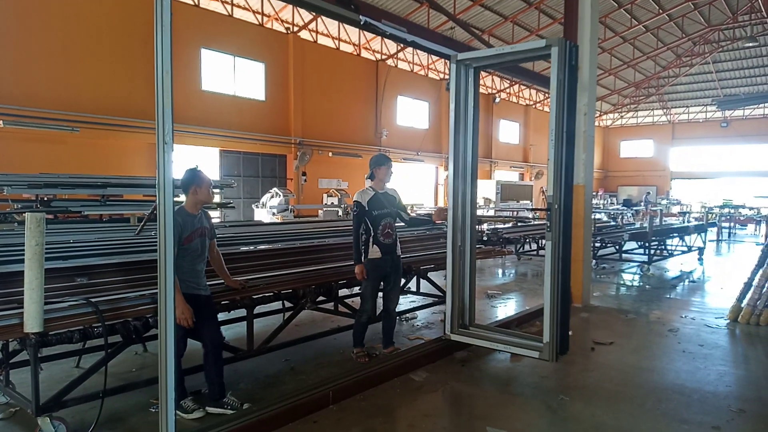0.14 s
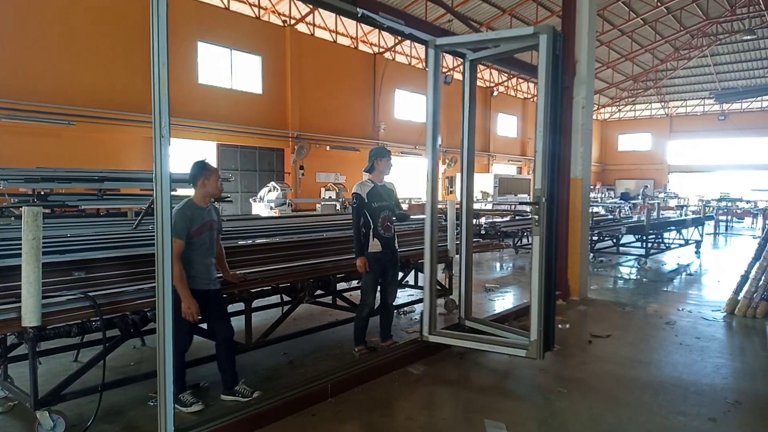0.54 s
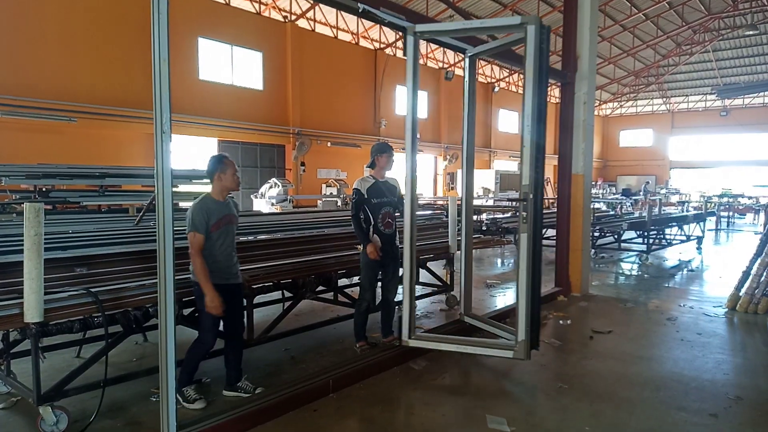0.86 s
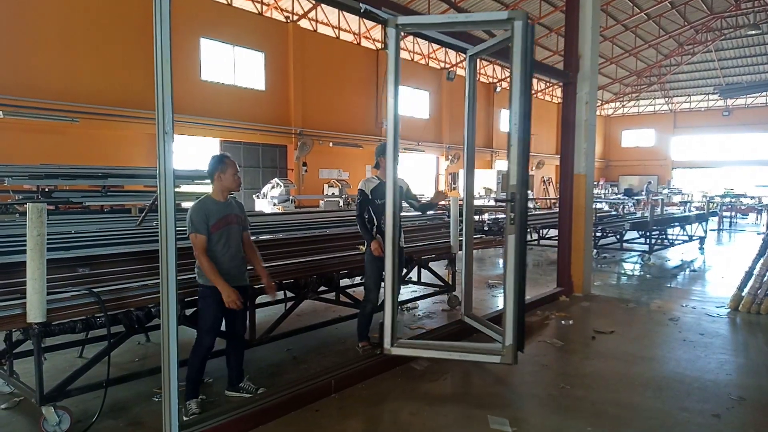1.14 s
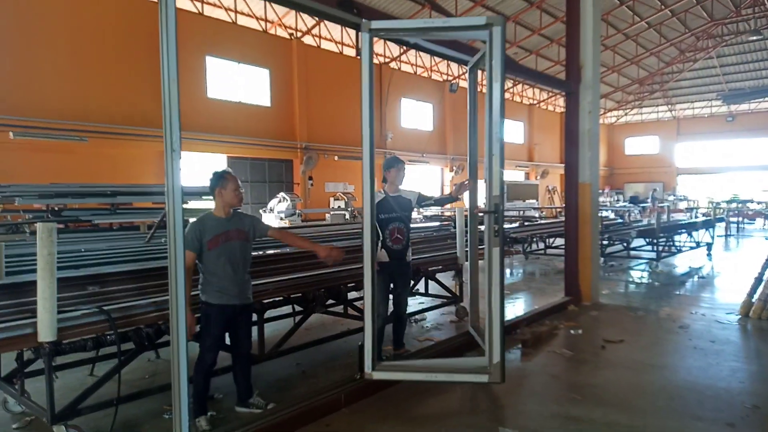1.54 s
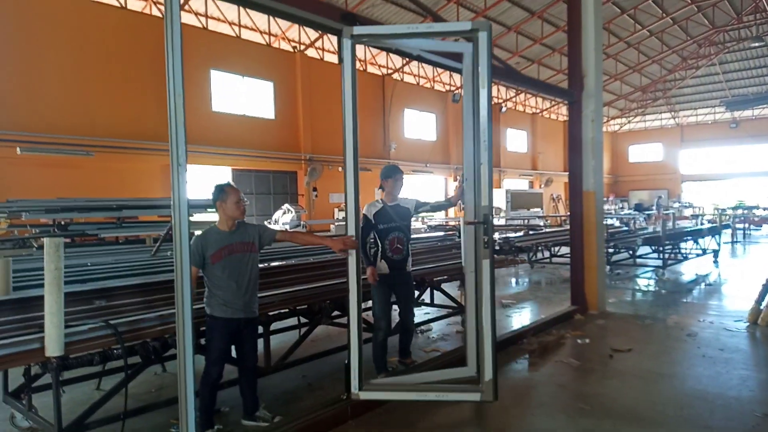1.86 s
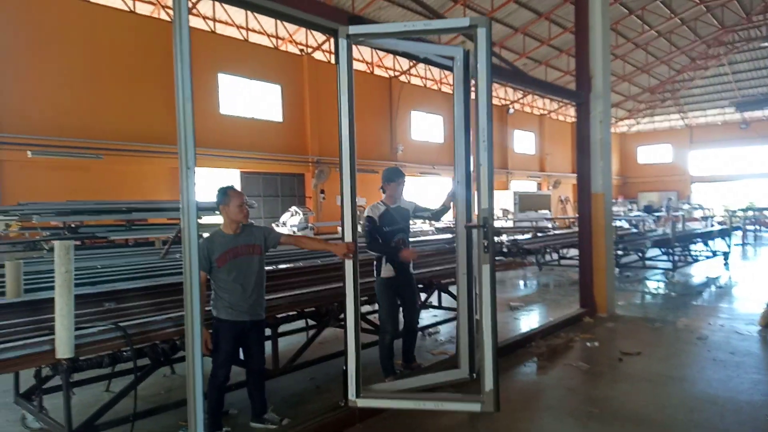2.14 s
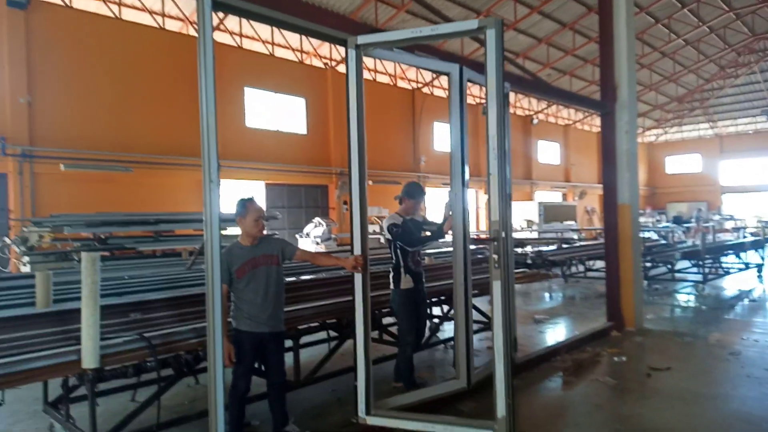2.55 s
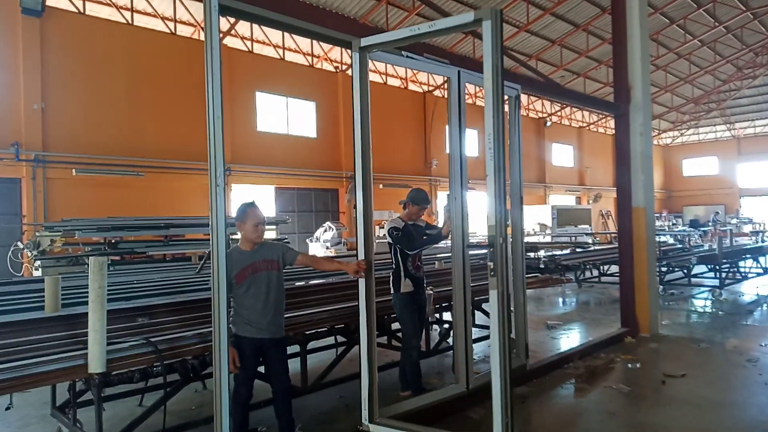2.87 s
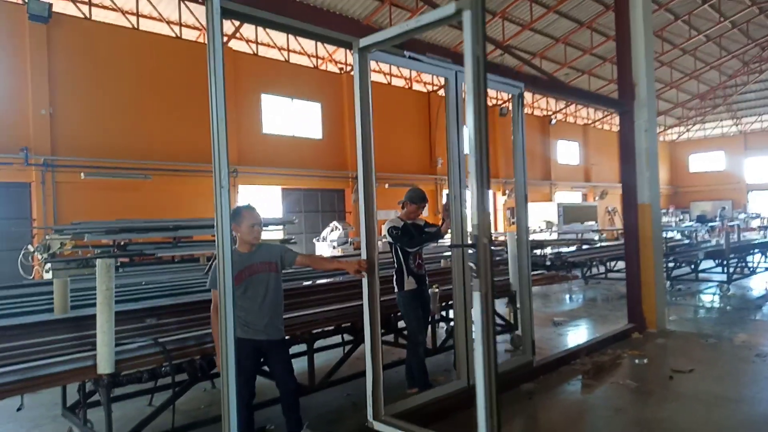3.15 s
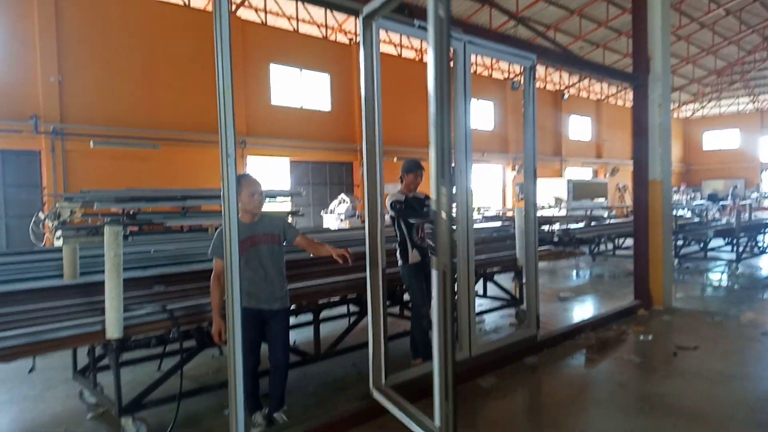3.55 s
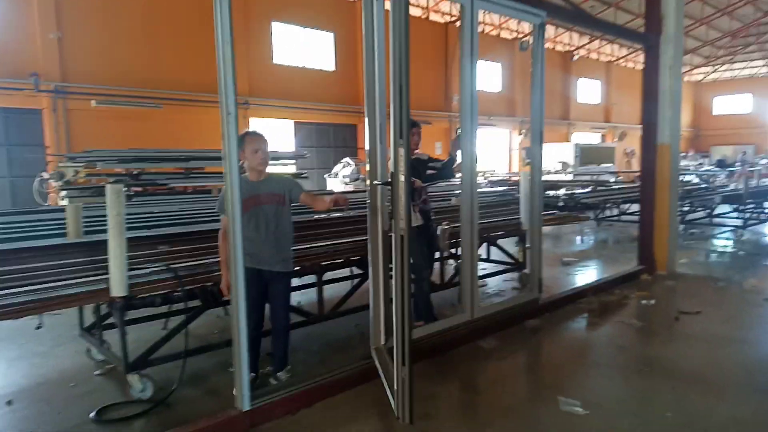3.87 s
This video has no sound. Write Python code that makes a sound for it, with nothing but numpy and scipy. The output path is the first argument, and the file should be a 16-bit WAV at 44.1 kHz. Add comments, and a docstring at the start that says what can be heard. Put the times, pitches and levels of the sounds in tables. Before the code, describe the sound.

An aluminium folding door rumbles along a gritty track with a brief hinge chirp and sharp joint clacks, goes nearly quiet, then judders and slams with a metallic ring in a large, still workshop.

```python
"""An aluminium folding door is drawn along its track: rollers cross grit in dense tiny bumps and rattle.
Joints clack in short noise bursts, and dry hinges rub, chirp and sing in narrow bands and thin tones.
A loose latch ticks; a last push makes the frame judder, moan and slam straight.
The slam is bursts of noise plus fading metal tones, which ring on in a large workshop with still air."""
import sys
import numpy as np
from scipy import signal
from scipy.fft import rfft, irfft
from scipy.io import wavfile
from scipy.ndimage import uniform_filter1d

SR = 44100
rng = np.random.default_rng(int(sys.argv[2]) if len(sys.argv) > 2 else 0)


def dump(signal):
    """Clip the signal to [-1, 1] and save it as 16-bit WAV at the path in sys.argv[1]."""
    limited = np.clip(np.atleast_2d(signal).T, -1, 1)
    pcm = np.round(limited * 32767).astype(np.int16)
    wavfile.write(sys.argv[1], SR, pcm)


N = 176400
TIME = np.arange(N) / SR

# In tables of tone colour, levels are relative. T60 is the time to fade by 60 dB.
# colour of the still air in the workshop: f/Hz, level/dB
AIR_COLOUR = [(25, -42), (91, -22.5), (128, -8.5), (211, -6), (300, -10), (1160, -16), (4650, -16.5),
              (6800, -26), (7700, -47.5)]
# how long the hall rings at each pitch: f/Hz, T60/s
HALL_FADE = [(120, 0.5), (500, 1.5), (1000, 1.29), (2500, 0.69), (4000, 0.31), (7000, 1.26)]
# ticks of the latch: t/s, level/dB
LATCH_TIMES = [(1.814, -53), (1.828, -66)]
# ringing tones of the latch: f/Hz, relative level/dB, T60/s
LATCH_MODES = [(1090, -15, 0.065), (1310, 3.5, 0.065), (1650, -10, 0.12), (2034, -8, 0.1),
               (3273, -13, 0.12)]
# thin tones of the hinge: t/s, length/s, f/Hz, level/dB, decay time constant/s
HINGE_TONES = [(2.242, 0.085, 3980, -59.5, 0.17), (2.249, 0.027, 4490, -60.5, 0.16),
               (2.286, 0.038, 4830, -64, 0.04)]
# hinge chirps: t/s, length/s, level/dB, relative level of the shrill overtone/dB
HINGE_CHIRPS = [(0.494, 0.044, -38, -10), (0.541, 0.058, -43, -10.5), (2.234, 0.15, -65.5, -14),
                (2.867, 0.05, -61, -22)]
# resonances of the hinge: f/Hz, width/Hz, relative level/dB
HINGE_BANDS = [(3970, 370, 1.5), (4370, 410, -0.5), (4680, 300, -5.5)]
# faint rubbing as the leaves swing: t/s, level/dB
SWING_LEVEL = [(2.62, -83), (2.72, -65), (3.05, -68.5), (3.27, -70.5)]
# colour of that rubbing: f/Hz, level/dB
RUB_COLOUR = [(50, -28.5), (150, 13), (500, -4), (1000, 3.5), (4200, 4), (6500, -7.5)]
# jolts of the frame: t/s, level/dB, centre f/Hz
FRAME_JOLTS = [(0.14, -43, 230), (0.546, -33, 1020), (3.332, -43.5, 328), (3.349, -35.5, 338),
               (3.479, -26.5, 572), (3.75, -44, 700), (3.84, -47, 540)]
# clacks of the joints: t/s, level/dB, centre f/Hz, spread/octaves, relative level of the thump/dB
JOINT_CLACKS = [(0.097, -55, 3600, 0.49, -28), (0.12, -32.5, 3100, 0.4, -3), (1.141, -27.5, 2790, 0.11, -9),
                (1.174, -30.5, 3000, 0.22, -9), (1.216, -24.5, 2940, 0.31, -8),
                (2.844, -47.5, 3880, 0.63, -9.5), (3.973, -48.5, 970, 0.16, -12)]
# what the hollow bar passes of a clack: f/Hz, level/dB
BAR_COLOUR = [(100, -3), (1000, 3.5), (2750, 5.5), (3300, 0), (4000, 10.5), (4700, -3.5), (7700, -15)]
# dragging frame in the last push: t/s, rumble level/dB, groan level/dB, treble level/dB
PUSH_LEVELS = [(3.262, -69, -88, -96), (3.272, -62.5, -54, -55.5), (3.35, -39.5, -46, -54),
               (3.43, -47, -43.5, -54), (3.5, -41, -38, -38.5), (3.62, -50, -42, -65.5),
               (3.7, -47, -51.5, -57.5), (3.76, -57.5, -43, -61), (3.87, -57, -64.5, -63.5),
               (4, -67, -74, -67.5)]
# colour of the groan: f/Hz, level/dB
GROAN_COLOUR = [(200, -34), (340, -8), (470, -4.5), (620, -13.5), (890, -6), (1100, -11), (1400, -26.5)]
# moaning tones of the dragging frame: t/s, length/s, starting f/Hz, level/dB, glide/(Hz per s)
FRAME_MOANS = [(3.353, 0.093, 660, -40.5, 750.5), (3.728, 0.079, 895, -42, -400),
               (3.77, 0.15, 503, -47, -0.5), (3.789, 0.17, 440, -47.5, 100.5)]
# blows of the slam: t/s, level/dB, top of the bright range f/Hz
SLAM_BLOWS = [(3.448, -22, 4200), (3.458, -21.5, 7500), (3.473, -31.5, 6000), (3.527, -29.5, 4000)]
# colour of the dense metal ring: f/Hz, level/dB
METAL_COLOUR = [(30, -48), (75, -30), (125, 9.5), (190, -12.5), (280, -4.5), (900, 2), (1550, 1.5),
                (2300, 7.5), (3600, 7), (4500, 0.5), (5700, -4), (7000, -12), (7800, -28.5)]
# ringing tones of the aluminium frame: f/Hz, relative level/dB, T60/s
FRAME_MODES = [(179.5, -4, .9), (421, -7, .7), (501, 3, .65), (547, -3, .6), (683, 0, .4), (801, 0, .5),
               (873, -1, .8), (1225, -6, .65), (1819, -5, .55), (2071, -6, .45), (2265, -3, .5),
               (2409, -4, .5), (2797, -4, .4), (3237, -2, .35), (3687, -3, .3), (6821, -16, .35)]
# rollers on the track: t/s, rumble level/dB, middle level/dB, treble level/dB
ROLL_LEVELS = [(0, -83, -66.5, -76), (.085, -60, -63, -67), (.1, -55.5, -52, -46.5),
               (.2, -75.5, -47.5, -47.5), (.41, -61, -46.5, -49), (.45, -54.5, -41, -49),
               (.6, -58, -44, -43.5), (.85, -56.5, -40.5, -46), (1.32, -51.5, -43.5, -49),
               (1.47, -55.5, -49, -53), (1.6, -62, -65, -55), (1.72, -71, -90, -66.5), (2, -80, -80, -77)]
# colours of the three roller layers, low to high: f/Hz, level/dB
RUMBLE_COLOUR = [(30, -42.5), (85, -33.5), (130, -6), (190, 1.5), (300, 0), (450, -1), (900, -55)]
ROAR_COLOUR = [(200, -31), (330, -10), (450, 5), (580, 2), (690, 7), (830, 2.5), (1050, 7.5), (1350, -4),
               (1850, -3), (2500, -33)]
GRIT_COLOUR = [(900, -26.5), (1500, 0), (2800, 3), (3950, 1), (4600, -7.5), (5800, -10.5), (6800, -20.5),
               (7700, -61)]
# scraping of the seal as the leaf starts off: t/s, level/dB
SCRAPE_LEVEL = [(.085, -90), (.1, -54.5), (.36, -51.5), (.46, -67), (.65, -61), (.9, -82)]
# colour of that scraping: f/Hz, level/dB
SEAL_COLOUR = [(2500, -10), (4000, 10.5), (6400, 0.5), (7700, -22)]

AIR_DB, EDGE_HZ = -70, 7700
# _S: decay time constants; _RISE_S: build-up times
KNOCK_S, KNOCK_RISE_S, KNOCK_OCTAVES = 0.0095, 0.0026, 1.11
CLACK_S, THUMP_S, CLACK_RISE_S = 0.011, 0.015, 0.0035
SLAM_S, SLAM_RISE_S = 0.014, 0.0044
SLAM_RING_DB, SLAM_RING_S = -15, 0.1  # slower part of each blow
SHRILL_HZ, SHRILL_WIDTH_HZ = 5400, 400
SQUEAK_RING_DB = -10
FRAME_SLAM_DB, FRAME_ROLL_DB = -35, -19
PROFILE_T60_S, PROFILE_SLAM_DB, PROFILE_ROLL_DB = 0.64, -42.02, -5.5
GRAINS_PER_S, GRAIN_SPREAD_DB = 3000, 1.5
SURGE_DB, SURGE_S = 2, 0.033  # strength and half-length of the smoothing
RATTLES_PER_S, RATTLE_DB = 31, -14.5


def amp(db):
    """Turns decibels into a gain."""
    return 10 ** (np.asarray(db) / 20)


def unit(x):
    """Scales a sound to an average (rms) strength of 1."""
    return x / np.sqrt(np.mean(x ** 2) + 1e-20)


def read(points, hz):
    """Reads a table between its points, with pitch spaced as the ear hears it."""
    f, value = np.transpose(points)
    return np.interp(np.log(hz + 1), np.log(f), value)


def levels(table):
    """Makes one gain curve for each dB column, practically silent outside the table."""
    t, *columns = np.transpose(table)
    return [amp(np.interp(TIME, t, db, left=-140, right=-140)) for db in columns]


def colour(x, points, size=4096):
    """Gives a sound a tone colour with a unit-energy filter that never acts ahead of time."""
    hz = np.fft.rfftfreq(size, 1 / SR)
    octaves_above = np.log2(np.maximum(hz / points[-1][0], 1))
    db = read(points, hz) - 24 * octaves_above
    log_gain = np.log(amp(np.r_[db, db[-2:0:-1]]))
    # the Hilbert transform finds the phase that acts soonest
    taps = np.fft.ifft(np.exp(np.conj(signal.hilbert(log_gain)))).real
    return signal.oaconvolve(x, taps / np.linalg.norm(taps))[:N]


def grains(rate, spread_db):
    """Scatters tiny impacts of uneven size at random times."""
    size = amp(spread_db * np.minimum(rng.exponential(1, N), 4))
    sign = rng.choice([-1, 1], N)
    happens = rng.random(N) < rate / SR
    return unit(size * sign * happens)


def burst(start, decay_s, rise_s):
    """Noise of metal chattering on metal, which rises and then dies away."""
    t = np.maximum(TIME - start, 0)
    return rng.standard_normal(N) * np.minimum(t / rise_s, 1) * np.exp(-t / decay_s)


def band(hz, width_hz):
    """A resonance kept going by friction: noise in a narrow band."""
    f = np.fft.rfftfreq(N, 1 / SR)
    gain = 1 / (1 + (2 * (f - hz) / width_hz) ** 4)
    return unit(irfft(rfft(rng.standard_normal(N)) * gain, N))


def stroke(start, length, skew):
    """A loudness arch that peaks early when skew is below 1."""
    progress = np.clip((TIME - start) / length, 0, 1)
    return np.sin(np.pi * progress ** skew)


def tone(hz, waver):
    """A friction tone whose pitch wanders a little."""
    drift = unit(uniform_filter1d(rng.standard_normal(N), size=500))
    return np.sin(2 * np.pi * np.cumsum(hz * (1 + waver * drift)) / SR)


def frame_ring():
    """The frame's own tones after one blow, each fading at its own pace."""
    t = TIME[:SR]
    ring = 0
    for hz, db, t60 in FRAME_MODES:
        ring = ring + amp(db - 60 * t / t60) * np.sin(2 * np.pi * (hz * t + rng.random()))
    return (1 - np.exp(-t / SLAM_RISE_S)) * ring


def profile_ring(count=260):
    """A dense crowd of high tones of the long hollow bars, each of chance strength."""
    t = TIME[:SR // 2]
    ring = 0
    for size, place, turn in rng.random((count, 3)):
        hz = 1300 + 6000 * place
        ring = ring + size ** 2 * np.sin(2 * np.pi * hz * t + 2 * np.pi * turn)
    return unit(ring) * amp(-60 * t / PROFILE_T60_S)


def hall(x, wet_db):
    """Adds a spread-out fading echo to the direct sound, with the power kept."""
    hz, t, noise = signal.stft(rng.standard_normal(SR), SR, nperseg=256)
    fade = amp(-60 * t / read(HALL_FADE, hz)[:, None])
    tail = signal.istft(noise * fade, SR, nperseg=256)[1]
    tail *= np.minimum(TIME[:len(tail)] / 0.0021, 1)
    wet = signal.fftconvolve(x, tail / np.linalg.norm(tail))[:N]
    return (x + amp(wet_db) * wet) / np.hypot(1, amp(wet_db))


def still_air():
    """The workshop's still air: steady noise with a soft tone colour."""
    return amp(AIR_DB) * colour(rng.standard_normal(N), AIR_COLOUR)


def latch():
    """The loose latch ticks and bounces once: ringing tones with a tiny burst of grit."""
    out = 0
    for start, db in LATCH_TIMES:
        t = np.maximum(TIME - start, 0)
        # the held start value before the tick is kept: each cosine rests at its peak
        ring = 0
        for hz, mode_db, t60 in LATCH_MODES:
            ring = ring + amp(mode_db - 60 * t / t60) * np.cos(2 * np.pi * hz * t)
        tick = colour(burst(start, 0.0055, 0.0008), GRIT_COLOUR)
        out = out + amp(db) * (ring + tick)
    return hall(out, wet_db=-6.5)


def squeaks():
    """A hinge sings in thin friction tones that ring on."""
    out = 0
    for start, length, hz, db, ring_s in HINGE_TONES:
        t = np.maximum(TIME - start, 0)
        ring = amp(SQUEAK_RING_DB) * np.minimum(t / length, 1) * np.exp(-t / ring_s)
        loudness = stroke(start, length, 0.42) + ring
        out = out + amp(db) * loudness * tone(hz, waver=0.002)
    return hall(out, wet_db=0)


def hinges():
    """Dry hinges rub as the leaves swing, and chirp in narrow bands when they slip."""
    squeal = unit(sum(amp(db) * band(hz, width) for hz, width, db in HINGE_BANDS))
    shrill = band(SHRILL_HZ, SHRILL_WIDTH_HZ)
    chirps = 0
    for start, length, db, shrill_db in HINGE_CHIRPS:
        voice = squeal + amp(shrill_db) * shrill
        chirps = chirps + amp(db) * stroke(start, length, 0.39) * voice
    rub = levels(SWING_LEVEL)[0] * colour(grains(1200, 3), RUB_COLOUR)
    return hall(chirps + rub, wet_db=-2.5)


def knocks():
    """The frame jolts in its track: short noise knocks, each around its own pitch."""
    hz = np.geomspace(60, 4000, 30)
    out = 0
    for start, db, centre_hz in FRAME_JOLTS:
        distance = np.log2(hz / centre_hz) / KNOCK_OCTAVES
        shape = -40 * np.log10(1 + distance ** 2)
        knock = colour(burst(start, KNOCK_S, KNOCK_RISE_S), np.c_[hz, shape])
        out = out + amp(db) * knock
    return hall(out, wet_db=-1.5)


def clacks():
    """Play in the joints is taken up: a clack of noise over a thump of the frame."""
    hz = np.geomspace(100, 7700, 30)
    out = 0
    for start, db, centre_hz, octaves, thump_db in JOINT_CLACKS:
        distance = np.log2(hz / centre_hz) / octaves
        shape = read(BAR_COLOUR, hz) - 20 * np.log10(1 + distance ** 2 / 2)
        clack = colour(burst(start, CLACK_S, CLACK_RISE_S), np.c_[hz, shape])
        thump = burst(start, THUMP_S, CLACK_RISE_S)
        body = amp(-3.5) * colour(thump, ROAR_COLOUR) + amp(-4.5) * colour(thump, RUMBLE_COLOUR)
        out = out + amp(db) * (clack + amp(thump_db) * body)
    return hall(out, wet_db=2.5)


def push():
    """The frame drags and judders in uneven slips, moaning briefly in gliding tones."""
    low, mid, high = levels(PUSH_LEVELS)
    drag = low * colour(grains(700, 2.4), RUMBLE_COLOUR)
    drag += mid * colour(grains(1200, 0.93), GROAN_COLOUR)
    drag += high * colour(grains(4100, 0.97), GRIT_COLOUR)
    moans = 0
    for start, length, hz, db, glide in FRAME_MOANS:
        voice = tone(hz + glide * (TIME - start), waver=0.008)
        moans = moans + amp(db) * stroke(start, length, 0.53) * voice
    return hall(drag + moans, wet_db=-15.5)


def slam():
    """The leaves snap straight and bounce; strong tones stand out of a dense metal ring."""
    blows = 0
    for start, db, top_hz in SLAM_BLOWS:
        blow = burst(start, SLAM_S, SLAM_RISE_S)
        blow += amp(SLAM_RING_DB) * burst(start, SLAM_RING_S, SLAM_RISE_S)
        b, a = signal.butter(2, top_hz, fs=SR)
        blows = blows + amp(db) * signal.lfilter(b, a, blow)
    modes = amp(FRAME_SLAM_DB) * frame_ring()
    bars = amp(PROFILE_SLAM_DB) * colour(np.r_[profile_ring(), np.zeros(N)], METAL_COLOUR)
    # the ring starts with the first blow
    wait = np.zeros(round(SLAM_BLOWS[0][0] * SR))
    ring = np.r_[wait, modes + bars[:SR], np.zeros(N)][:N]
    return hall(colour(blows, METAL_COLOUR), wet_db=-5.5) + hall(ring, wet_db=-14.5)


def rollers():
    """Rollers run over grit in the track in small surges; loose parts rattle and the metal rings."""
    low, mid, high = levels(ROLL_LEVELS)
    bumps = grains(GRAINS_PER_S, GRAIN_SPREAD_DB)
    smooth = np.hanning(int(2 * SURGE_S * SR))
    surge = amp(SURGE_DB * unit(signal.fftconvolve(rng.standard_normal(N), smooth, "same")))

    chatter = rng.standard_normal(800) * np.exp(-TIME[:800] / 0.0042)
    rattle = unit(signal.fftconvolve(grains(RATTLES_PER_S, 4.3), chatter)[:N])
    bumps = unit(bumps + amp(RATTLE_DB) * rattle)

    # every bump sets the frame and the hollow bars ringing
    ring = unit(signal.fftconvolve(bumps, frame_ring())[:N])
    bars = unit(colour(signal.fftconvolve(bumps, profile_ring())[:N], GRIT_COLOUR))

    rumble = low * colour(grains(600, 2.64), RUMBLE_COLOUR)
    roar = mid * (colour(bumps, ROAR_COLOUR) + amp(FRAME_ROLL_DB) * ring)
    grit = high * unit(colour(bumps, GRIT_COLOUR) + amp(PROFILE_ROLL_DB) * bars)
    scrape = levels(SCRAPE_LEVEL)[0] * colour(grains(2700, 1.8), SEAL_COLOUR)
    return hall(surge * (rumble + roar + grit + scrape), wet_db=-6.0)


def scene():
    """Adds the door to the still air, with the same sound on both sides."""
    mono = still_air() + latch() + squeaks() + hinges() + knocks()
    mono += clacks() + push() + slam() + rollers()
    return np.array([mono, mono])


def record(dry):
    """Cuts away the treble above the edge."""
    taps = signal.firwin(301, EDGE_HZ, window=("kaiser", 8), fs=SR)
    return signal.oaconvolve(dry, taps[None], "same")


dry = scene()
out = record(dry)
dump(out)
```